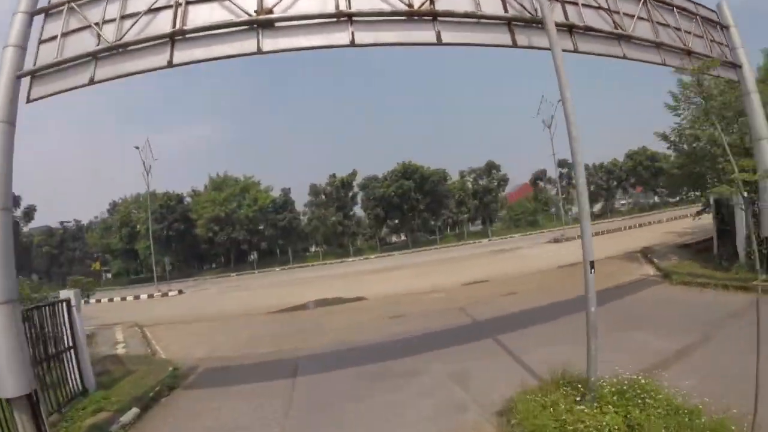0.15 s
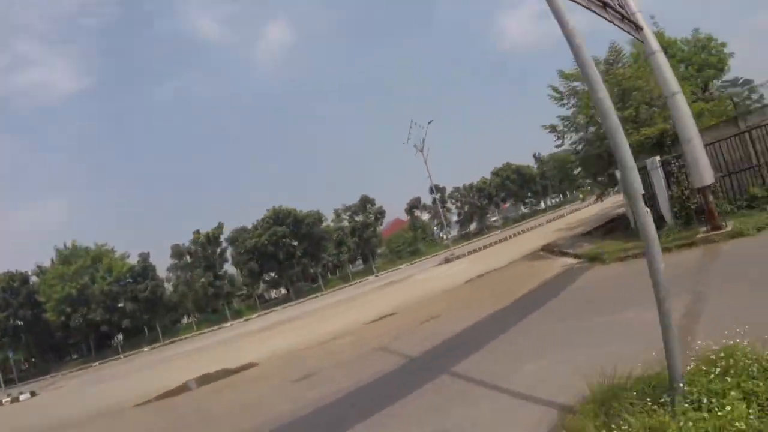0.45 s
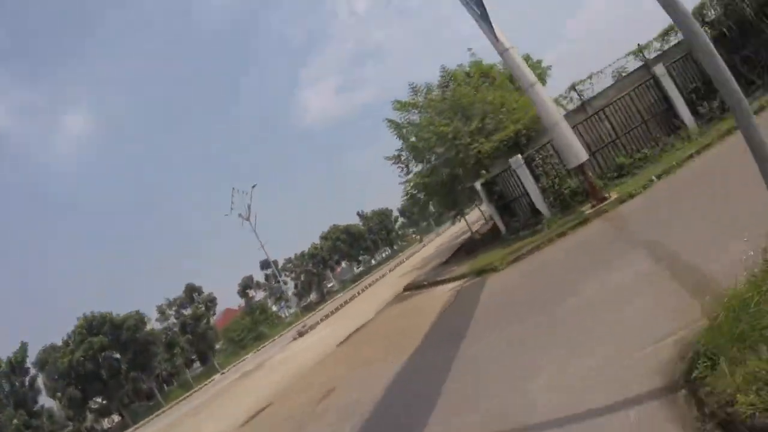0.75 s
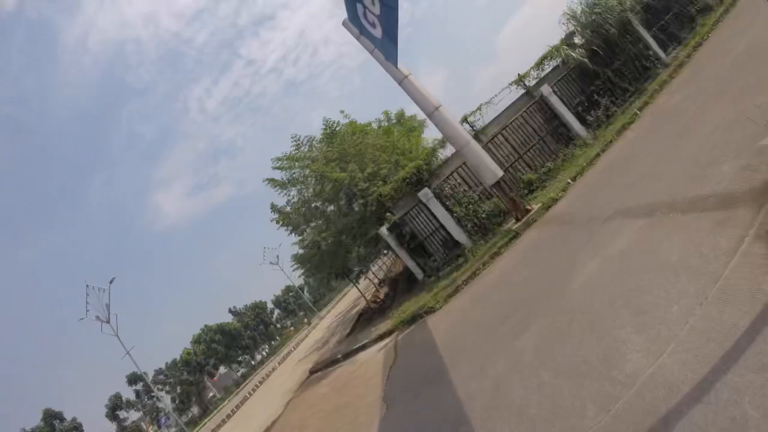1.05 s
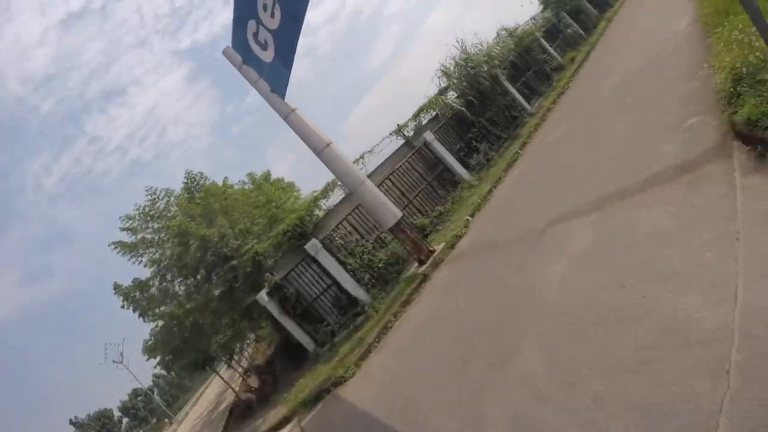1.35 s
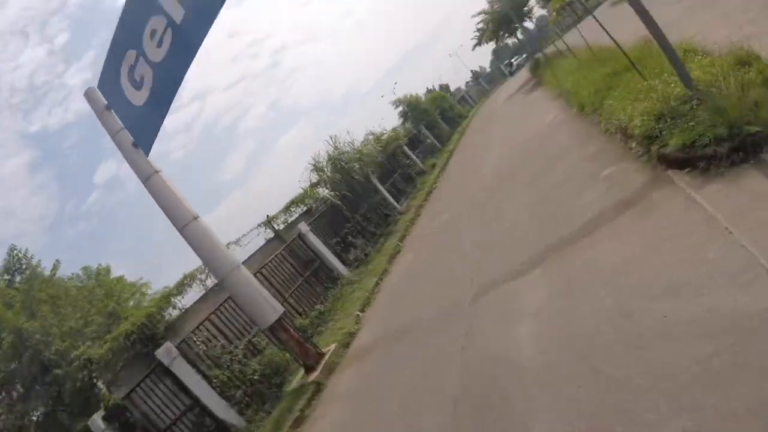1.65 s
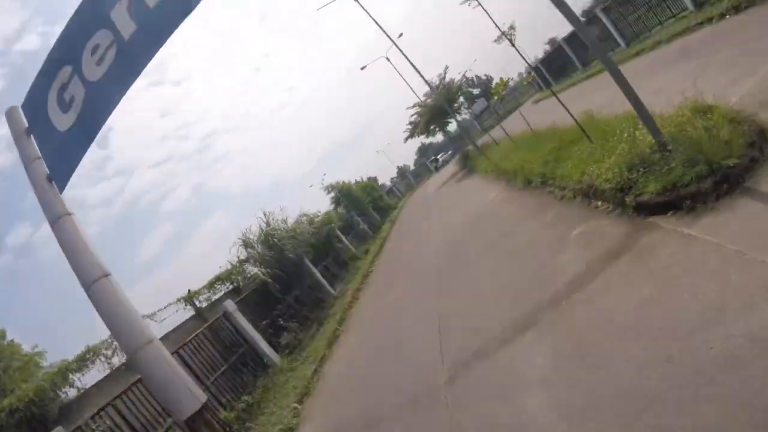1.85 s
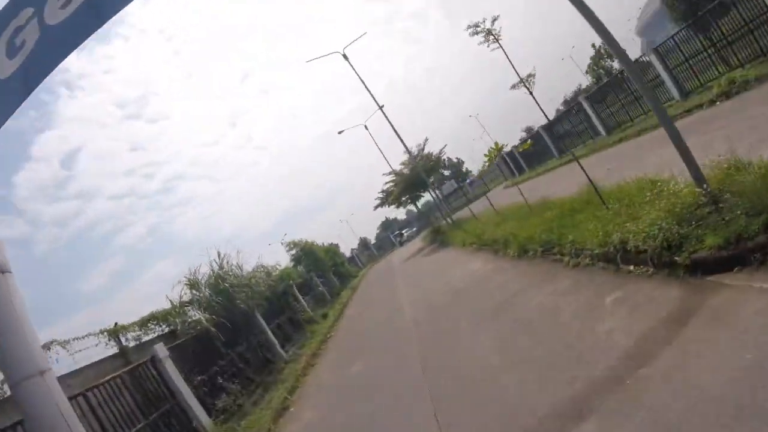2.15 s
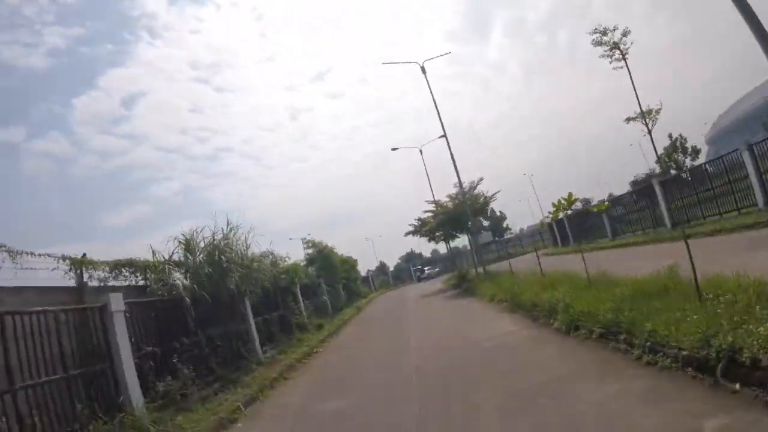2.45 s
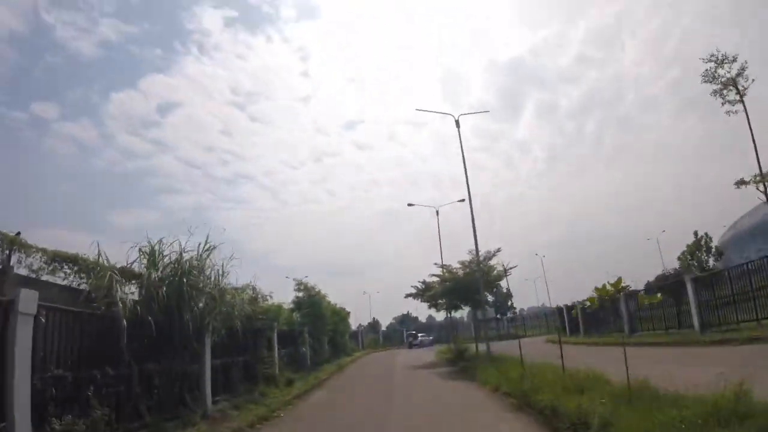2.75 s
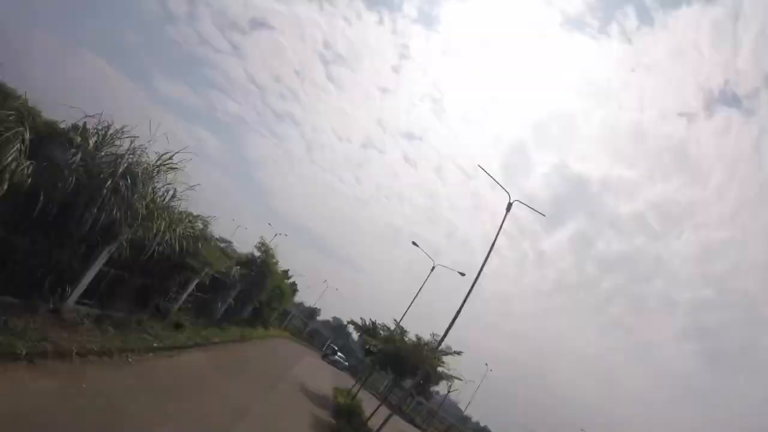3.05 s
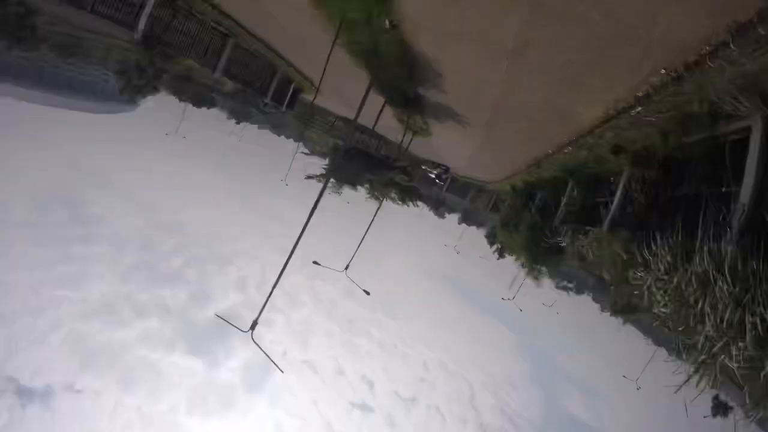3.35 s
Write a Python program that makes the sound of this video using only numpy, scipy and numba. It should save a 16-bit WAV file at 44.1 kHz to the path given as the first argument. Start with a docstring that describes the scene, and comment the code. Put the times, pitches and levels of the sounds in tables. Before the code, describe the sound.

A small racing drone's motors hum and whine unsteadily, surge, then drop to a ragged idle.

```python
"""A beating, unsteady hum comes first: four unbalanced rotors of a small racing quadcopter shake its frame.
Heard from its own camera, it banks, cruises, climbs, cuts the throttle and idles. Sines at multiples of shaft
speed make the three-blade thrum and whine; chopped noise makes the blade hiss. Coloured noise makes the air
rushing over the housing and the low gusts buffeting it. The camera's limiter ducks the whole mix whenever the
sound swells."""
import sys
import numpy as np
from scipy import signal
from scipy.fft import rfft, irfft
from scipy.io import wavfile
from scipy.ndimage import uniform_filter1d, minimum_filter1d
from numba import njit

SR = 44100
rng = np.random.default_rng(int(sys.argv[2]) if len(sys.argv) > 2 else 0)


def materialize(psi):
    """Save the field psi as 16-bit PCM at rate SR to the path in sys.argv[1].

    A 1-D psi becomes a single channel; in a 2-D psi each row is a channel.
    """
    bounded = np.clip(np.atleast_2d(psi).T, -1, 1)
    quanta = np.round(bounded * 32767).astype(np.int16)
    wavfile.write(sys.argv[1], SR, quanta)


N = 154350  # samples, 3.5 s

# Shaft speeds through the flight: t/s, rotor 1 f/Hz, rotor 2 f/Hz, rotor 3 f/Hz, rotor 4 f/Hz
ROTOR_SPEEDS = [(0.0, 269.4, 270.5, 217.0, 194.0), (0.12, 267.0, 273.1, 225.0, 201.0),
                (0.25, 269.0, 271.0, 222.0, 205.0), (0.4, 271.2, 273.0, 216.0, 201.0),
                (0.46, 232.1, 242.7, 189.0, 152.0), (0.58, 229.7, 236.0, 183.0, 141.0),
                (0.73, 230.8, 237.9, 188.0, 140.0), (0.8, 264.0, 267.2, 204.0, 160.0),
                (0.87, 270.7, 277.3, 212.0, 166.0), (0.92, 291.2, 306.6, 214.0, 180.0),
                (1.04, 276.3, 289.9, 237.0, 195.0), (1.23, 267.8, 276.0, 231.0, 213.0),
                (1.31, 242.6, 243.6, 202.0, 193.0), (1.45, 238.1, 231.0, 198.0, 193.0),
                (1.58, 245.9, 234.7, 201.0, 197.0), (1.7, 248.4, 232.3, 205.0, 200.0),
                (1.82, 260.8, 249.2, 215.0, 207.0), (1.92, 259.3, 244.3, 216.0, 206.0),
                (2.02, 265.4, 236.5, 220.0, 200.0), (2.11, 259.8, 236.5, 221.0, 195.0),
                (2.19, 220.6, 202.8, 173.0, 160.0), (2.3, 211.2, 202.2, 174.0, 160.0),
                (2.39, 216.3, 208.1, 177.0, 165.0), (2.46, 254.6, 255.4, 212.0, 195.0),
                (2.54, 277.2, 265.6, 238.0, 215.0), (2.62, 311.0, 272.1, 266.0, 243.0),
                (2.7, 330.0, 289.7, 283.0, 255.0), (2.8, 335.0, 296.7, 290.0, 260.0),
                (2.88, 329.7, 287.5, 283.0, 255.0), (2.93, 266.0, 252.1, 245.0, 225.0),
                (3.0, 161.3, 154.4, 186.0, 146.0), (3.09, 164.0, 164.8, 188.0, 140.0),
                (3.17, 154.8, 148.9, 140.0, 122.0), (3.2, 128.0, 122.0, 78.0, 75.0),
                (3.25, 104.0, 88.0, 118.0, 100.0), (3.3, 120.0, 96.0, 108.0, 85.0),
                (3.36, 70.0, 84.0, 92.0, 62.0), (3.415, 113.0, 98.0, 78.0, 88.0),
                (3.46, 72.0, 84.0, 100.0, 66.0), (3.5, 68.0, 75.0, 90.0, 80.0)]
# One row per rotor, before frame, housing, speed and load: imbalance shake level/dB, blade tone level/dB,
# blade thrum level/dB, extra overtone level/dB
ROTOR_LEVELS = [(-8, -37.5, -28, -2), (-13, -44, -43.5, -1.5), (-22.5, -37.5, -35, -0.5),
                (-26, -41, -43, 1)]
# How hard the propellers bite into the air: t/s, whine level/dB, hiss level/dB
PROPELLER_LOAD = [(0, 3, 5), (.09, 1.5, -3.5), (.2, -0.5, 1.5), (.4, 6.5, 3), (.6, 6.5, 5.5), (.78, 1.5, 5),
                  (.92, 3.5, 4), (1.2, 1.5, 0.5), (1.35, 2, 1), (1.5, 2, 2.5), (1.8, -1, 3),
                  (2.05, -1.5, 2.5), (2.3, -5.5, 1), (2.44, 3, 6.5), (2.54, -2.5, 2), (2.68, 0, 4.5),
                  (2.89, -2, 0.5), (2.94, -3.5, -4.5), (3.12, 4, -2), (3.5, 15, -5)]
BLADES, CRUISE_HZ = 3, 275  # blades per propeller; shaft speed where speed adds no level

# How the frame passes shaking to the camera: f/Hz, level/dB
FRAME_RESPONSE = [(60, -48), (125, -36), (148, -12), (162, -14.5), (182, -9.5), (210, -11), (235, -5.5),
                  (262, -4.5), (278, -8), (295, -14), (335, -18), (420, -33)]
# How the frame passes slow blade pulses, heard as the rotors idle: f/Hz, level/dB
THRUM_RESPONSE = [(150, -17), (205, -3.5), (250, -8), (300, -2), (365, -3.5), (420, 9), (490, -67),
                  (600, -19), (800, -61)]
# How the housing passes the propeller tones: f/Hz, level/dB
HOUSING_RESPONSE = [(150, 6), (350, -3.5), (470, 7.5), (600, 2.5), (780, -2), (1000, 1.5), (1350, -4.5),
                    (1700, -15), (1900, -11), (2350, -15.5), (2650, -18), (3200, -19.5), (3900, -24.5),
                    (5000, -10), (6800, -13.5)]
# Whine partials: multiples of the shaft rate
WHINE_MULTIPLES = (2, 3, 4, 5, 6, 7, 9, 12, 15, 21)
BETWEEN_BLADES_DB = -16.5  # partials that are not multiples of the blade rate
OVERTONE_DB_PER_OCTAVE = -3.5  # tilt across the partials, from the blade rate
WHINE_DB_PER_OCTAVE, BRIGHTEN_DB_PER_OCTAVE = 10, 6  # with shaft speed: whole whine; extra above blade rate
BLADE_FLUTTER_DB, WOBBLE_CYCLES = 2.2, 0.026  # spread of each partial's level; of shaft phase under power
# With the throttle cut the blades tumble through their own wash and turn ragged: onset f/Hz, added spreads
WASH_BELOW_HZ, WASH_WOBBLE_CYCLES, WASH_FLUTTER_DB = 216, 0.056, 2.5

# Propeller hiss colour, power per Hz before levelling: f/Hz, level/dB
HISS_COLOUR = [(400, 0.5), (900, 16.5), (1600, -14.5), (2500, -10), (3800, -11), (4400, -8), (4950, 3.5),
               (5900, -1), (6600, 8), (7600, 2.5), (9000, 3.5), (10300, -3), (12000, -14), (15000, -24.5)]
HISS_DB, HISS_DB_PER_OCTAVE = -42.5, 11  # four rotors together at cruise, before load; gain with speed
HISS_CHOP, HISS_FLUTTER_DB = 0.35, 1.63  # depth of the blade pulsing; spread under power

# Colour of air rushing over the housing, power per Hz before levelling: f/Hz, level/dB
AIR_COLOUR = [(100, -17), (180, 22.5), (280, 17.5), (400, -7), (600, -3.5), (900, -6.5), (1120, 0),
              (1380, 7), (1750, -9.5), (2500, -12), (3800, -32.5), (6000, -58), (6800, -10), (8000, -16),
              (9500, -13.5), (12000, -48), (15000, -40)]
AIR_DB, AIR_FLUTTER_DB, AIR_SWELL_DB = -39.5, 1.5, -1  # centre level; fast and slow spread
# Colour of the low wind buffets, power per Hz before levelling: f/Hz, level/dB
BUFFET_COLOUR = [(20, -17), (45, 3.5), (80, -0.5), (130, -1.5), (220, -4.5), (500, -9), (1500, -60)]
# How strongly the gusts buffet the housing: t/s, level/dB
GUST_LEVELS = [(0, -49), (.48, -43), (.58, -33.5), (.66, -41.5), (.8, -34), (.95, -34), (1.12, -45),
               (1.4, -42.5), (2.2, -36.5), (2.55, -37.5), (2.72, -37), (2.88, -36.5), (3.02, -34),
               (3.22, -37), (3.5, -37)]

LIMIT_DB, LIMIT_RATIO = -14.5, 4.7  # peak threshold; dB in per dB out above it
LIMIT_ATTACK_S, LIMIT_RELEASE_S = 0.0002, 0.028
TOP_HZ = 15100  # top of the camera's passband


def undb(db):
    """Decibels to gain."""
    return 10 ** (np.asarray(db) / 20)


def curve(at, table, col=1):
    """Straight lines through the rows of a table."""
    table = np.array(table, float)
    return np.interp(at, table[:, 0], table[:, col])


def response(hz, table):
    """Gain of a (f/Hz, level/dB) curve on a log-frequency axis."""
    table = np.array(table, float)
    return undb(np.interp(np.log(hz + 1e-3), np.log(table[:, 0]), table[:, 1]))


def noise(colour):
    """Noise of rms 1 with the given colour."""
    spectrum = rfft(rng.standard_normal(N))
    bins_hz = np.arange(N // 2 + 1) * SR / N
    x = irfft(spectrum * response(bins_hz, colour), N)
    return x / x.std()


def walk(rate):
    """Smooth random wander of spread 1; a higher rate in Hz wanders faster."""
    window = max(int(SR / rate), 2)
    x = uniform_filter1d(rng.standard_normal(N), window)
    x = uniform_filter1d(x, window)
    return x / x.std()


def wash(hz):
    """Raggedness in a rotor's own wash: 0 under power, rising to 1 as it slows to idle."""
    return np.clip(2 * (1 - hz / WASH_BELOW_HZ), 0, 1)


def frame_hum(hz, angle, shake_db):
    """Imbalance shakes the frame once a turn; frame resonances set how loud each speed hums."""
    return undb(shake_db) * response(hz, FRAME_RESPONSE) * np.sin(angle)


def blade_thrum(hz, angle, thrum_db):
    """Each passing blade pushes the frame, a thrum that comes forward when the rotor is slow."""
    return undb(thrum_db) * response(BLADES * hz, THRUM_RESPONSE) * np.sin(BLADES * angle)


def blade_whine(hz, angle, level_db, overtone_db):
    """Blade tone and its partials through the housing, louder and brighter with shaft speed."""
    octaves = np.log2(hz / CRUISE_HZ)
    whine = 0
    for multiple in WHINE_MULTIPLES:
        db = OVERTONE_DB_PER_OCTAVE * np.log2(multiple / BLADES)
        if multiple % BLADES > 0:
            db = db + BETWEEN_BLADES_DB
        if multiple > BLADES:
            db = db + overtone_db + BRIGHTEN_DB_PER_OCTAVE * octaves
        db = db + BLADE_FLUTTER_DB * walk(22.7)
        whine = whine + undb(db) * response(multiple * hz, HOUSING_RESPONSE) * np.sin(multiple * angle)
    return whine * undb(level_db + WHINE_DB_PER_OCTAVE * octaves)


def rotor(hz, turns, load_db, shake_db, blade_db, thrum_db, overtone_db):
    """One shaft drives a steady-phase hum, plus a thrum and whine that share one phase wobble."""
    angle = 2 * np.pi * turns
    wobble_cycles = (WOBBLE_CYCLES + WASH_WOBBLE_CYCLES * wash(hz)) * walk(52)
    blade_angle = angle + 2 * np.pi * wobble_cycles
    hum = frame_hum(hz, angle, shake_db)
    thrum = blade_thrum(hz, blade_angle, thrum_db)
    return hum + thrum + blade_whine(hz, blade_angle, blade_db + load_db, overtone_db)


def blade_hiss(hz, turns):
    """Turbulence off the blades, pulsing as each passes, louder with speed and ragged at idle."""
    chop = 1 + HISS_CHOP * np.cos(2 * np.pi * BLADES * turns)
    flutter_db = (HISS_FLUTTER_DB + WASH_FLUTTER_DB * wash(hz)) * walk(28)
    level_db = HISS_DB + HISS_DB_PER_OCTAVE * np.log2(hz / CRUISE_HZ) + flutter_db
    return noise(HISS_COLOUR) * chop * undb(level_db) / 2  # four independent hisses add as power


def wind(t):
    """Air rushes unevenly over the housing and buffets it in gusts."""
    rush_db = AIR_DB + AIR_FLUTTER_DB * walk(75) + AIR_SWELL_DB * walk(4.7)
    rush = noise(AIR_COLOUR) * undb(rush_db)
    buffets = noise(BUFFET_COLOUR) * undb(curve(t, GUST_LEVELS))
    return rush + buffets


def scene():
    """Four rotors and the wind of flight."""
    t = np.arange(N) / SR
    whine_load_db = curve(t, PROPELLER_LOAD, 1)
    hiss_load_db = curve(t, PROPELLER_LOAD, 2)
    out = np.zeros(N)
    for k, levels in enumerate(ROTOR_LEVELS):
        hz = curve(t, ROTOR_SPEEDS, k + 1)
        turns = np.cumsum(hz) / SR
        out = out + rotor(hz, turns, whine_load_db, *levels)
        out = out + blade_hiss(hz, turns) * undb(hiss_load_db)
    out = out + wind(t)
    return out[None]


@njit
def follow(x, attack, release):
    """Level follower with separate rise and fall speeds, as fractions per sample."""
    out, level = np.empty(len(x)), 0.
    for i in range(len(x)):
        level += (x[i] - level) * (attack if x[i] > level else release)
        out[i] = level
    return out


def record(dry):
    """A fast look-ahead limiter holds the peaks down; a steep lowpass cuts the top."""
    peaks = -minimum_filter1d(-np.abs(dry[0]), size=200)  # loudest sample nearby, ahead or behind
    envelope = follow(peaks, 1 / (1 + LIMIT_ATTACK_S * SR), 1 / (1 + LIMIT_RELEASE_S * SR))
    under = np.minimum(1, undb(LIMIT_DB) / (envelope + 1e-9))
    gain = under ** (1 - 1 / LIMIT_RATIO)
    lowpass = signal.ellip(10, .2, 80, TOP_HZ, fs=SR, output="sos")
    return signal.sosfilt(lowpass, dry * gain)


dry = scene()
out = record(dry)
materialize(out)
```